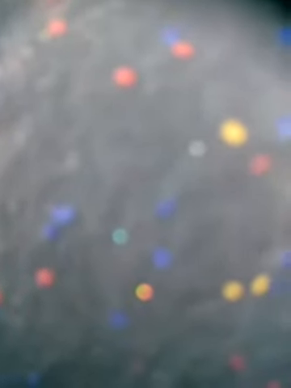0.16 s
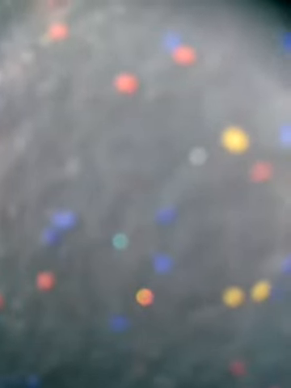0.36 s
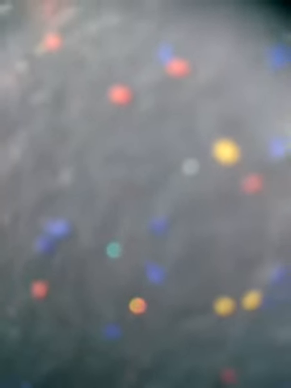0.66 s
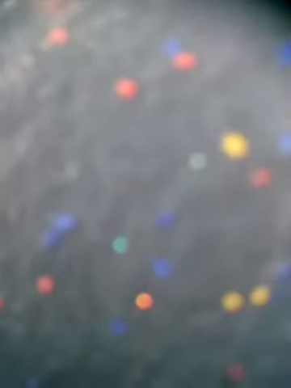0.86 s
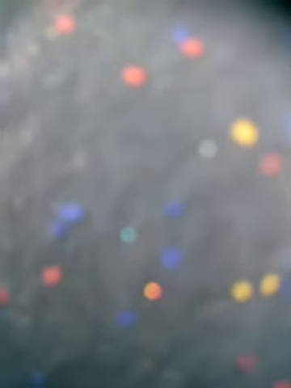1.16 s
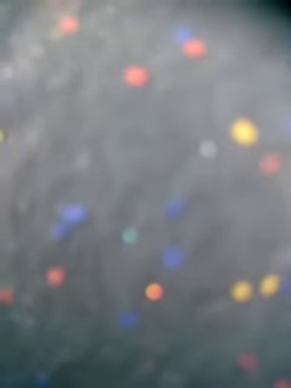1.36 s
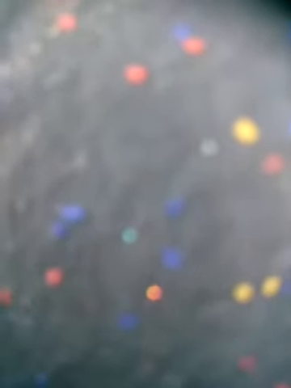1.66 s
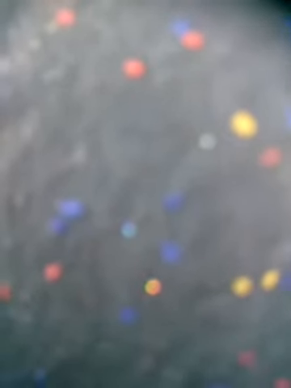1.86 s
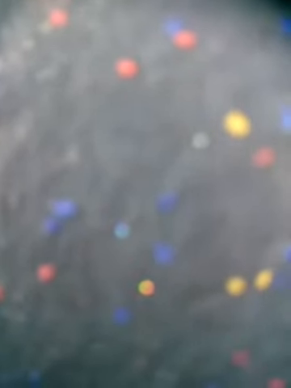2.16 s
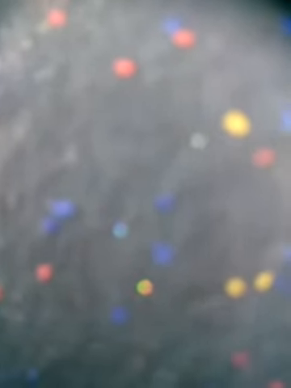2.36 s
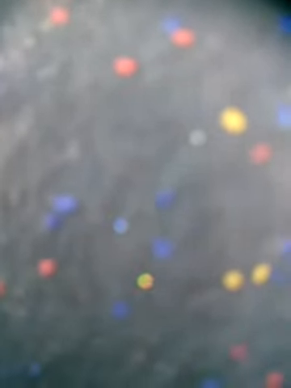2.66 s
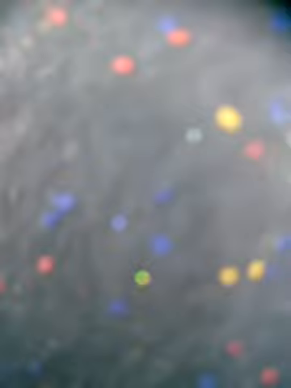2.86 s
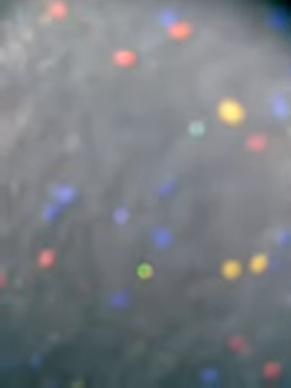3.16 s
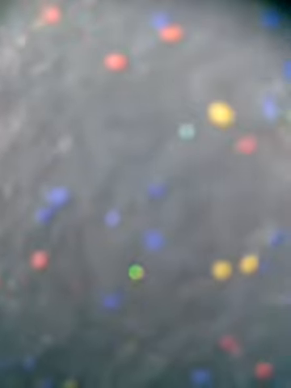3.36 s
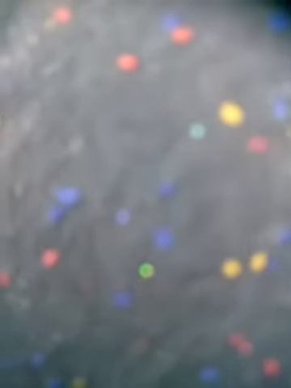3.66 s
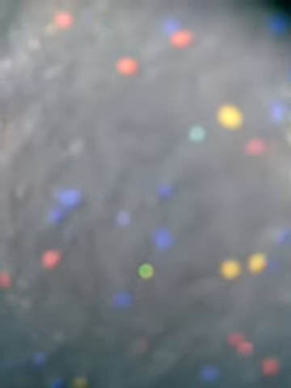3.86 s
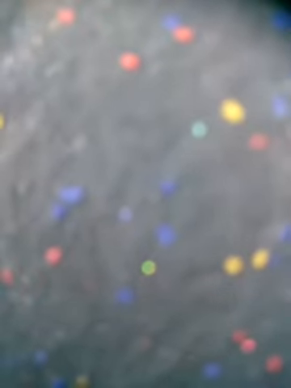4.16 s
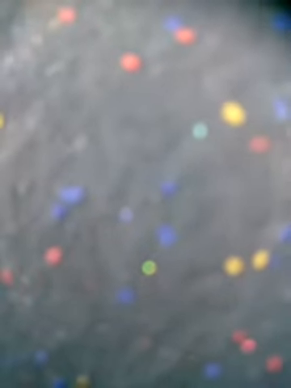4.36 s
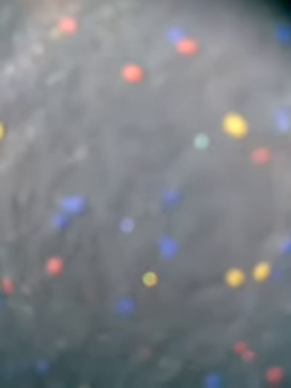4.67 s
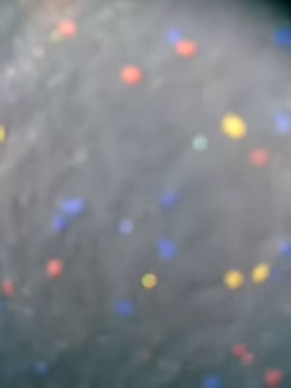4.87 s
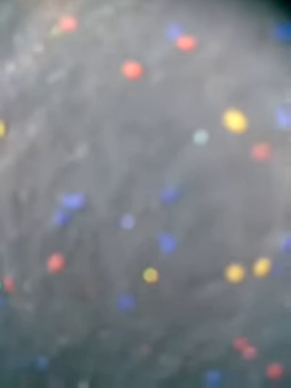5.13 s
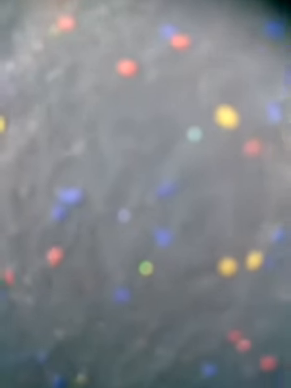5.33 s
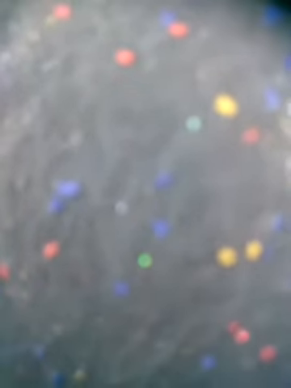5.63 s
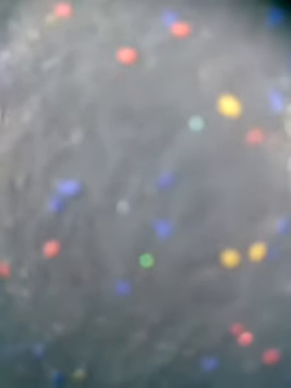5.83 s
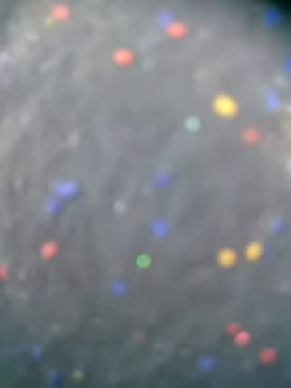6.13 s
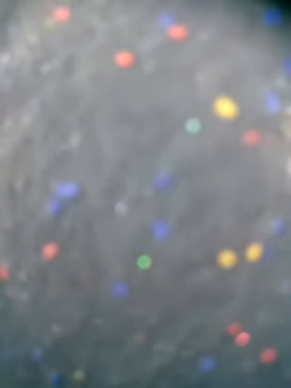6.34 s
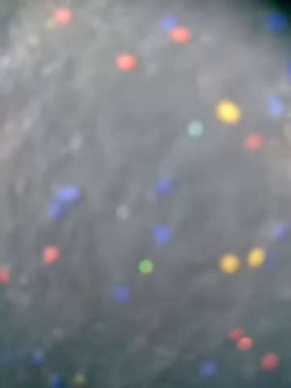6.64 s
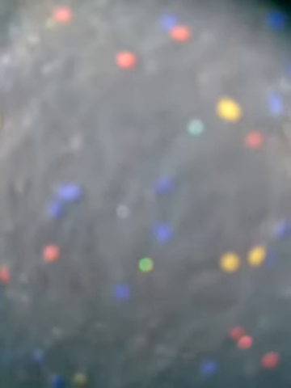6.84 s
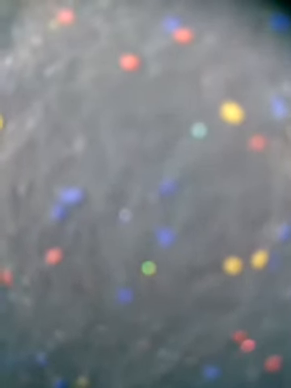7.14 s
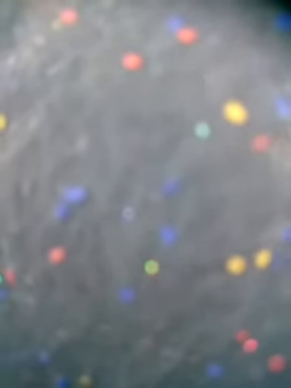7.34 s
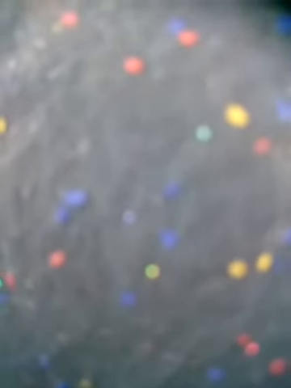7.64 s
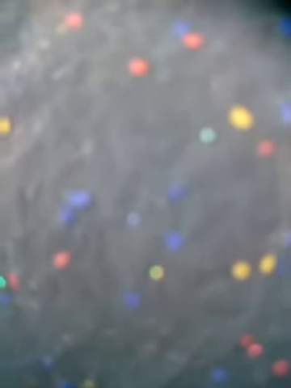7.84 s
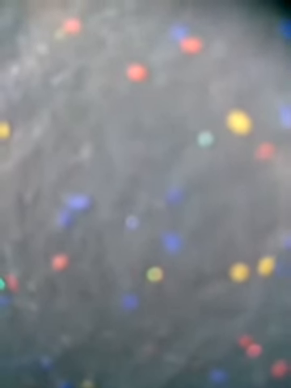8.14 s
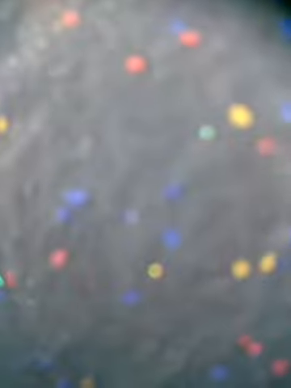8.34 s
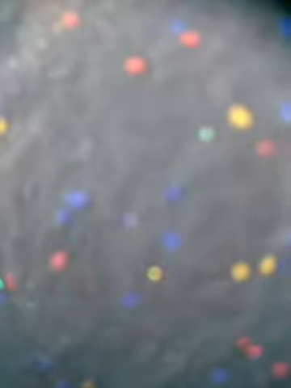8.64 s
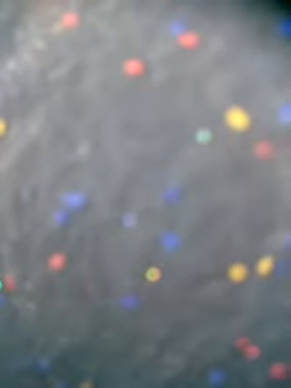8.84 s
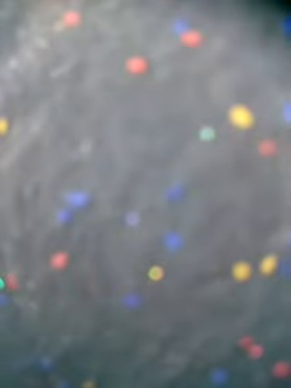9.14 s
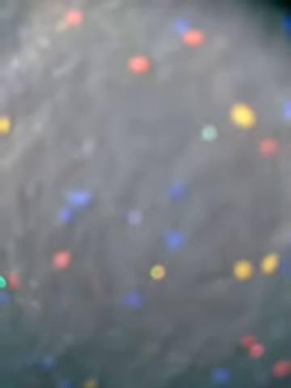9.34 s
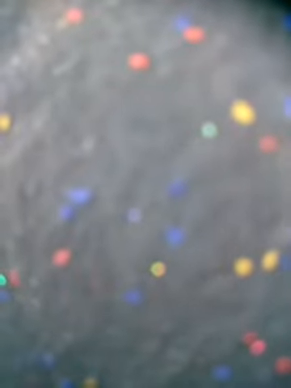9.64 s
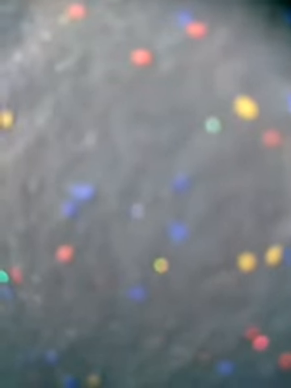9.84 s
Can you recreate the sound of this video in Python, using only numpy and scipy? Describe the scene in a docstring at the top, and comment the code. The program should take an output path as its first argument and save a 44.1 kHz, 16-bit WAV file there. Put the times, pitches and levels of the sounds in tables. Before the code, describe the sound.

Inside a moving bus, a big diesel engine first coasts with falling pitch over low tyre rumble and soft hums, with a faint gearbox whine. It takes up load and growls louder, drops sharply in pitch at a gear change, labours, then climbs back and settles into a strong, booming drone with clatter and a thin airy turbo whistle. The microphone sits in the cabin, so the sound is bassy and enclosed.

```python
"""Inside a city bus pulling away

A six-cylinder diesel coasts, takes up load, sags at a gear change, then pulls hard. Its firing harmonics
boom when the speed carries them onto a mode of the cabin; its uneven cylinders shake the body and panels.
Noise that pulses with each firing makes the rumble, the injector clatter and the ringing of the engine block.
The turbocharger spools up in two steps, blowing air through the intake pipe and whistling.
Tyre noise lies underneath, with two early soft hums and a third soon after, a brief gearbox whine and a few ticks.
"""
import sys
import numpy as np
from scipy import signal
from scipy.fft import rfft, irfft
from scipy.io import wavfile
from scipy.ndimage import uniform_filter1d

SR = 44100
rng = np.random.default_rng(int(sys.argv[2]) if len(sys.argv) > 2 else 0)


def generate_wav(signal):
    """Clip the signal to [-1, 1] and save it as 16-bit WAV at the path in sys.argv[1]."""
    frames = np.transpose(np.atleast_2d(signal))
    scaled = np.clip(frames, -1, 1) * 32767
    pcm = np.round(scaled).astype(np.int16)
    wavfile.write(sys.argv[1], SR, pcm)


N = 441000
T = np.arange(N) / SR
FREQS = np.fft.rfftfreq(N, 1 / SR)

# Tyre noise in the cabin. Each row: frequency in Hz, relative level in dB per Hz.
ROAD_SPECTRUM = [(20, -29), (38, -13.5), (48, -16.5), (74, 5), (92, -4), (115, -8.5), (150, -13),
                 (190, -12.5), (300, -24), (900, -72)]
# Response of the bus body. Each row: frequency in Hz, relative level in dB per Hz.
BODY_RESPONSE = [(20, -28), (38, -16), (48, -15), (76, -3.5), (96, 1.5), (118, -14.5), (160, -12),
                 (200, -10.5), (240, -17), (325, -12.5), (410, -22.5), (470, -16.5), (515, -27),
                 (590, -23.5), (680, -28.5), (860, -30), (1020, -60), (1600, -53.5), (3000, -78.5)]
# Injector and combustion noise. Each row: frequency in Hz, relative level in dB per Hz.
CLATTER_SPECTRUM = [(400, -19.5), (850, 6), (1200, 7), (1550, -0.5), (2000, 2.5), (2900, -1.5),
                    (3800, -2.5), (5300, -4), (6200, -9), (7500, -22.5), (9500, -38.5), (15500, -32.5)]
# Air rushing into the engine. Each row: frequency in Hz, relative level in dB per Hz.
RUSH_SPECTRUM = [(2000, -14.5), (4200, -8.5), (5400, 0.5), (6000, 1.5), (7200, -7), (8300, -12.5),
                 (10000, -20.5), (11400, -15), (13000, -25), (15500, -21)]

# Balance of the two sides. Each row: frequency in Hz, left minus right in dB.
SIDE_BALANCE = [(70, -5.9), (140, -4.9), (162, -9.5), (208, -7.4), (280, -9.5), (380, -6), (620, -1),
                (5000, -3), (7400, -2.5), (8300, 5), (11200, 4.5), (12200, -1.6)]
# How alike the two sides are. Each row: frequency in Hz, likeness from 0 to 1.
SIDE_LIKENESS = [(100, 0.83), (200, 0.94), (350, 0.52), (600, 0.26), (4000, 0.2), (9000, .1)]
# Phase between the sides from the cabin's standing waves. Each row: frequency in Hz, left lead in radians.
STANDING_WAVES = [(70, 0.4), (140, -0.048), (200, 0.21), (500, -0.65), (2400, -0.59)]

# Engine speed: it drops at the upshift and later climbs back. Each row: time in seconds, firing rate in Hz.
ENGINE_SPEED = [(0, 74.36), (.6, 63.25), (1.6, 61.94), (2.6, 64.7), (3.0, 66.34), (3.22, 50.74),
                (3.38, 50.37), (3.56, 54.03), (3.81, 53.93), (4.05, 48.87), (4.68, 52.38), (5.02, 60.4),
                (5.2, 68.2), (6, 68.55), (7, 69.5), (8, 69.3), (9, 70.33), (10, 71)]
# How hard the engine pulls. Each row: time in seconds, share of full torque (0 coasting, 1 full).
TORQUE = [(1.44, 0.23), (1.52, 0.71), (2.1, 0.74), (3.2, .92), (5.3, 1)]
# Soft hums. Each row: time of the loudest moment in seconds, pitch in Hz, level in dB,
# fade on either side in dB per second.
COASTING_HUMS = [(.1, 328.5, -48.5, 10), (.1, 749, -65, 15), (1.1, 541.5, -60.5, 11.5)]
# Loose fittings. Each row: start in seconds, level in dB, ring frequency in Hz.
FITTING_TICKS = [(0.372, -60, 4130), (2.983, -61, 5600), (3.33, -60, 6200)]

# The turbocharger's speed-ups. Each row: start in seconds, whistle pitch it heads for in Hz, lag in seconds.
TURBO_SPOOLS = [(2.53, 5806, 0.16), (4.68, 7640, .66)]
# Steady resonances of the intake pipe. Each row: frequency in Hz, width in Hz, relative level in dB.
PIPE_RESONANCES = [(3940, 70, 0), (5265, 50, 3), (5625, 90, 3), (6190, 55, 3)]
# Engine block resonances. Each row: frequency in Hz, width in Hz, level at cruising revs in dB,
# change at lugging revs in dB.
BLOCK_RESONANCES = [(874, 116, -63.5, 3), (1175, 150, -71, -13), (2740, 660, -80.5, 14)]
# Multiples of the engine cycle that uneven cylinders favour. Each entry: multiple, extra level in dB.
FAVOURED_ORDERS = {7: 7.9, 9: 4.2, 11: 5.5, 14: 5.4, 15: 4.3, 27: 8.2, 28: 4.4, 30: 9.4, 34: 5.6, 36: 10.7,
                   37: 6.6, 40: 1.8, 52: 10.1, 57: 2.6, 75: 3.1}
# Narrow panel resonances that lift any order passing by. Each row: frequency in Hz, width in Hz, lift in dB.
PANEL_RESONANCES = [(161.2, 11, 11), (283.6, 16, 6), (327.8, 3.3, 4.5), (349.1, 8.8, 5), (369.4, 19.6, 4),
                    (467, 8.7, 5.5), (607, 18, 3.5), (883, 14, 5.5)]
# Air modes of the cabin. Each row: frequency in Hz, width in Hz, level in dB of a harmonic right on the mode.
AIR_MODES = [(68.2, 10.43, -26), (100, 9, -32.5), (139.78, 10.4, -29), (162.4, 7.9, -27.5),
             (205.4, 15.4, -38.5), (280.1, 16.4, -44)]
# Change in each of the first four firing harmonics when coasting. Each entry: level in dB.
HARMONIC_COAST_DB = [-19.5, -18.5, -3.5, -8.5]

PORT_DELAY_S = 20 / SR  # lead of the left side
CRUISE_HZ, LUG_HZ = 69, 50  # firing rates
# Body shaking: start level at full torque, change when coasting, growth with time
SHAKE_DB, SHAKE_COAST_DB, SHAKE_DB_PER_S = -43, -7.5, 0.11
# Turbocharger whistle with no boost and while coasting
NO_BOOST_HZ, TURBO_IDLE_HZ = 4470, 4830
# Gearbox whine: the length runs from the start to the release
WHINE_S, WHINE_LENGTH_S, WHINE_ATTACK_S, WHINE_RELEASE_S = .56, 0.77, 0.15, .4
# It slides down onto a steady pitch
WHINE_HZ, WHINE_SLIDE_HZ, WHINE_SETTLE_S = 1182, 125, .17
EDGE_HZ = 15700  # upper limit of the sound


def gain_of(db):
    """Turns decibels into amplitude."""
    return 10 ** (np.asarray(db) / 20)


def evened(x):
    """Scales a signal to an rms of 1."""
    return x / np.sqrt(np.mean(x ** 2) + 1e-20)


def read(points, hz):
    """Reads a frequency table at the given frequencies, on a logarithmic scale."""
    f, value = np.transpose(points)
    return np.interp(np.log(hz + 1), np.log(f + 1), value)


def curve(rows, t=T):
    """Joins the points of a two-column time table into a curve."""
    s, value = np.transpose(rows)
    return np.interp(t, s, value)


def wander(hz, t=T):
    """Makes slow random movement of rms 1, moving at up to about hz."""
    knots = uniform_filter1d(rng.standard_normal(2100), max(1, round(100 / hz)))
    return np.interp(t, np.arange(2100) / 200, evened(knots))  # 200 knots per second


def peak(hz, centre_hz, width_hz):
    """Gives the height of a resonance, 1 at its centre."""
    return 1 / (1 + (2 * (hz - centre_hz) / width_hz) ** 2)


def ring(x, hz, width_hz, step_s):
    """A steep resonance of gain 1 that takes time to build up and to die away."""
    r = np.exp(-np.pi * width_hz * step_s)
    pole = r * np.exp(2j * np.pi * hz * step_s)
    return signal.lfilter([(1 - r) ** 2], [1, -2 * pole, pole ** 2], x)


def whistle(hz, width_hz):
    """A fuzzy tone of rms 1: two narrow bands of noise carried along a pitch curve."""
    r = np.exp(-np.pi * width_hz / SR)
    noise = rng.standard_normal((2, N)) + 1j * rng.standard_normal((2, N))
    band = signal.lfilter([1], [1, -2 * r, r * r], noise)
    carrier = np.exp(2j * np.pi * np.cumsum(hz * np.ones(N)) / SR)
    return evened((band * carrier).real)


def side_gains(hz):
    """Left and right gains, which average 1 at every frequency."""
    ratio = gain_of(read(SIDE_BALANCE, hz))
    return 2 * np.array([ratio, np.ones_like(ratio)]) / (1 + ratio)


def lead_of(hz):
    """Radians by which the left side leads: a fixed delay plus the standing waves."""
    return 2 * np.pi * hz * PORT_DELAY_S + read(STANDING_WAVES, hz)


def coloured(pair, spectrum, band, low_hz=18):
    """Gives two noises a spectrum and a place in the cabin; the mean of the sides has rms 1 within the band."""
    a, b = rfft(pair)
    same = np.clip(read(SIDE_LIKENESS, FREQS), -1, 1)
    left = a * np.exp(1j * lead_of(FREQS))
    right = same * a + np.sqrt(1 - same ** 2) * b
    low_cut = FREQS ** 2 / np.hypot(FREQS ** 2, low_hz ** 2)
    sides = np.array([left, right]) * side_gains(FREQS) * gain_of(read(spectrum, FREQS)) * low_cut
    inside = (FREQS > band[0]) & (FREQS < band[1])
    return irfft(sides, N) / np.std(irfft(sides.mean(0) * inside, N))


def cabin(pair, t60=0.16):
    """Short reflections from windows and seats ripple the spectrum, differently on each side."""
    t = np.arange(8192) / SR
    paths = rng.standard_normal((2, 2, len(t))) * gain_of(-60 * t / t60)
    paths /= np.linalg.norm(paths, axis=2, keepdims=True) * np.sqrt(2)
    wet = signal.oaconvolve(pair[None], paths, axes=2).sum(1)[:, :N]
    share = .25  # reflected part of the power
    return np.sqrt(1 - share) * pair + np.sqrt(share) * wet


def pull(t=T):
    """Share of full torque."""
    return np.clip(curve(TORQUE, t), 0, 1)


def burn(full_at=.7):
    """Combustion noise rises with the torque and is complete well before full torque."""
    return np.minimum(pull() / full_at, 1)


def lug(t=T):
    """How hard the engine labours as its revs sag: 0 at cruising revs, 1 at lugging revs."""
    return (np.maximum(CRUISE_HZ - curve(ENGINE_SPEED, t), 0) / (CRUISE_HZ - LUG_HZ)) ** 2


def shake_db(t=T):
    """The body shakes with the torque, and slowly more as the bus gathers speed."""
    return SHAKE_DB + SHAKE_COAST_DB * (1 - pull(t)) + SHAKE_DB_PER_S * t


def puffs(firing, depth):
    """Two noises that swell at every firing."""
    return rng.standard_normal((2, N)) * (1 + depth * np.cos(firing))


def road(road_db=-42.0):
    """The tyres drum the floor with a steady low noise."""
    return gain_of(road_db) * coloured(rng.standard_normal((2, N)), ROAD_SPECTRUM, band=(20, 300))


def hums(width_hz=9):
    """Soft hums, each a narrow band of noise that fades away from its loudest moment."""
    out = np.zeros((2, N))
    for s, hz, db, fade in COASTING_HUMS:
        level = gain_of(db - fade * abs(T - s))
        out += level * side_gains(hz)[:, None] * whistle(hz, width_hz)[0]
    return out


def fittings(t60=0.094, width_hz=3500):
    """Loose trim ticks now and then: short bursts of noise around a ring frequency."""
    t = np.arange(4096) / SR
    hz = np.fft.rfftfreq(len(t), 1 / SR)
    out = np.zeros((2, N))
    for s, db, ring_hz in FITTING_TICKS:
        noise = rng.standard_normal((2, len(t)))
        tick = irfft(rfft(noise) * peak(hz, ring_hz, width_hz))
        out[:, round(s * SR):][:, :len(t)] += gain_of(db - 60 * t / t60) * evened(tick)
    return out


def gearbox(width_hz=60, whine_db=-60.5):
    """A soft falling whine, part tone and part fuzz, that starts before the engine takes up load."""
    clear = .38  # share of the pure tone
    age = np.maximum(T - WHINE_S, 0)
    hz = WHINE_HZ + WHINE_SLIDE_HZ * np.exp(-age / WHINE_SETTLE_S)
    attack = np.minimum(age / WHINE_ATTACK_S, 1)
    release = np.exp(-np.maximum(age - WHINE_LENGTH_S, 0) / WHINE_RELEASE_S)
    tone_hz = hz + width_hz / 6 * wander(40)
    tone = np.sqrt(2) * np.cos(2 * np.pi * np.cumsum(tone_hz) / SR)
    return gain_of(whine_db) * attack * release * (clear * tone + (1 - clear) * whistle(hz, width_hz))


def turbo_hz():
    """The heavy blades start gently and close in on each new speed with a lag."""
    hz, last = np.full(N, float(TURBO_IDLE_HZ)), TURBO_IDLE_HZ
    for s, goal_hz, lag_s in TURBO_SPOOLS:
        age = np.maximum(T - s, 0) / lag_s
        hz += (goal_hz - last) * (1 - (1 + age) * np.exp(-age))
        last = goal_hz
    return hz


def intake(rush_db=-72.5, pipe_db=-73, whistle_db=-58.0, surge_db=5.0, surge_hz_per_s=1300,
           whistle_width_hz=480, flicker_db=0.7):
    """Air rushes in with the boost and rings the pipe; the blades whistle, more keenly while they speed up."""
    hz = turbo_hz()
    boost = (hz - NO_BOOST_HZ) / (hz.max() - NO_BOOST_HZ)
    surge = np.tanh(np.gradient(hz) * SR / surge_hz_per_s)
    air = cabin(rng.standard_normal((2, N)))
    rush = gain_of(rush_db) * coloured(air, RUSH_SPECTRUM, band=(8000, 14000))
    pipe = sum(gain_of(db + pipe_db) * whistle(ring_hz, width) for ring_hz, width, db in PIPE_RESONANCES)
    blade_level = gain_of(whistle_db + read(RUSH_SPECTRUM, hz) + surge_db * surge)
    blades = side_gains(hz) * blade_level * cabin(whistle(hz, whistle_width_hz))
    return boost * (rush + pipe + blades) * gain_of(flicker_db * wander(16))


def block(firing, knock=0.13, coast_db=-17):
    """Under load the engine block rings with every firing; low revs shift the balance of its resonances."""
    rings = sum(gain_of(db + lug_db * lug()) * whistle(hz, width) for hz, width, db, lug_db in BLOCK_RESONANCES)
    return gain_of(coast_db * (1 - burn())) * rings * (1 + knock * np.cos(firing))


def clatter(firing, clatter_db=-66.5, coast_db=-6.0, knock=0.092):
    """Injector and combustion noise pulses with the firings, smeared by the cabin."""
    level = gain_of(clatter_db + coast_db * (1 - burn()))
    return level * coloured(cabin(puffs(firing, knock)), CLATTER_SPECTRUM, band=(1500, 2500))


def rumble(firing, rumble_db=-7, throb=0.53, low_hz=220):
    """Every firing shakes the panels, heard as throbbing noise."""
    level = gain_of(shake_db() + rumble_db)
    return level * coloured(puffs(firing, throb), BODY_RESPONSE, (250, 900), low_hz)


def orders(firing, orders_db=-14.5, drift=0.31, firing_db=2, lug_evens=0.49, count=90):
    """Unequal cylinders repeat once in six firings: multiples of that cycle shake the body and its panels."""
    t, fine_t = T[::441], T[::10]  # coarse times for the levels, finer ones for the waves
    cycle_hz = curve(ENGINE_SPEED, t) / 6
    cycle = np.exp(1j * firing[::10] / 6)
    load_db = shake_db(t)
    uneven = 1 - lug_evens * lug(t)  # the favoured orders stand out less at low revs
    out, turn = np.zeros((2, len(cycle))), 1
    for k in range(1, count):
        turn = turn * cycle
        if k in (1, 6, 12, 18, 24):  # the first is left out; boom() makes the other four
            continue
        hz = k * cycle_hz
        favour_db = FAVOURED_ORDERS.get(k, firing_db * (k % 6 == 0))
        panel_db = sum(db * peak(hz, centre, width) for centre, width, db in PANEL_RESONANCES)
        extra_db = favour_db * uneven + panel_db
        body_db = read(BODY_RESPONSE, hz) - read(BODY_RESPONSE, 325)
        size = gain_of(load_db + orders_db + body_db + extra_db)
        # strong, low orders hold steady; weak and high ones flutter
        waver = gain_of(-extra_db) * k / 90
        flutter = 1 + waver * (wander(5, t) + 1j * wander(5, t))
        phase = 2 * np.pi * rng.random() + drift * wander(0.93, t)
        swing = size * flutter / np.sqrt(1 + 2 * waver ** 2) * np.exp(1j * phase)
        # less likeness between the sides means a wider phase difference
        spread = np.arccos(np.clip(read(SIDE_LIKENESS, hz), -1, 1)) / 2
        lead = lead_of(hz) + rng.choice([-1, 1]) * spread
        sides = side_gains(hz) * swing * np.exp(1j * np.outer([1, 0], lead))
        out += [(np.interp(fine_t, t, side) * turn).real for side in sides]
    return np.sqrt(2) * signal.resample(out, N, axis=1)


def boom(firing, lag=0.059, waver_db=0.46):
    """The first harmonics of the exhaust pulses ring the cabin's modes as the speed carries them past."""
    t, angle = T[::10], firing[::10]  # low notes need only a tenth of the samples
    rate, slack = curve(ENGINE_SPEED, t), 1 - pull(t)
    out = np.zeros((2, len(t)))
    for k, coast_db in enumerate(HARMONIC_COAST_DB, 1):
        drive = gain_of(coast_db * slack) * np.exp(1j * (k * angle + lag * (k - 1)))
        air = sum(gain_of(db) * ring(drive, hz, width, t[1]) for hz, width, db in AIR_MODES)
        sides = side_gains(k * rate) * np.exp(1j * np.outer([1, 0], lead_of(k * rate)))
        out += gain_of(waver_db * wander(9, t)) * (sides * air).real
    return np.sqrt(2) * signal.resample(out, N, axis=1)


def scene():
    """One crankshaft, its speed wavering slightly, times the firing sounds; the other layers are added."""
    firing_hz = curve(ENGINE_SPEED) * (1 + 0.0017 * wander(4.1))
    firing = 2 * np.pi * np.cumsum(firing_hz) / SR  # phase in radians, one turn per firing
    background = road() + hums() + fittings() + gearbox()
    engine = intake() + block(firing) + clatter(firing) + rumble(firing) + orders(firing) + boom(firing)
    return background + engine


def record(dry):
    """Softens the very ends and removes the treble above the upper limit."""
    faded = dry * signal.windows.tukey(N, .002)
    low_pass = signal.firwin(511, EDGE_HZ, window=("kaiser", 9), fs=SR)
    return signal.oaconvolve(faded, low_pass[None], "same")


dry = scene()
out = record(dry)
generate_wav(out)
```